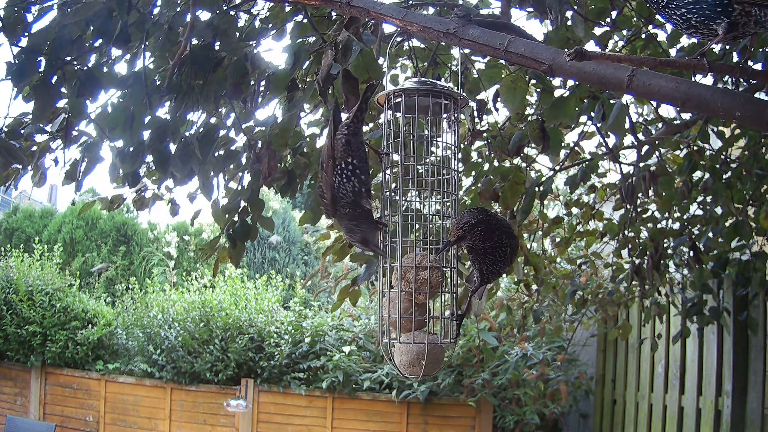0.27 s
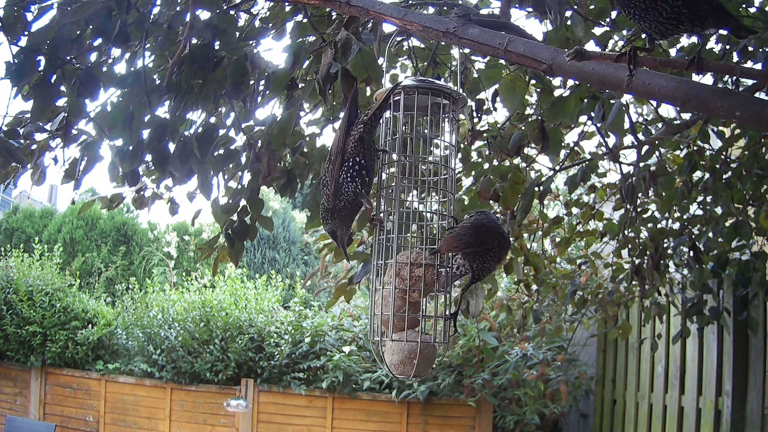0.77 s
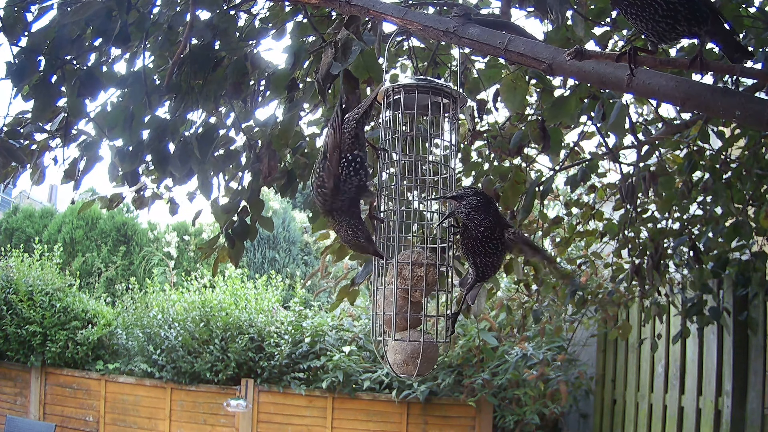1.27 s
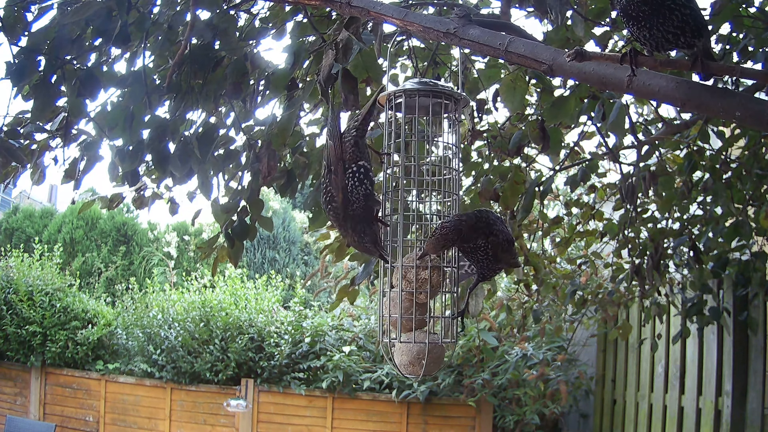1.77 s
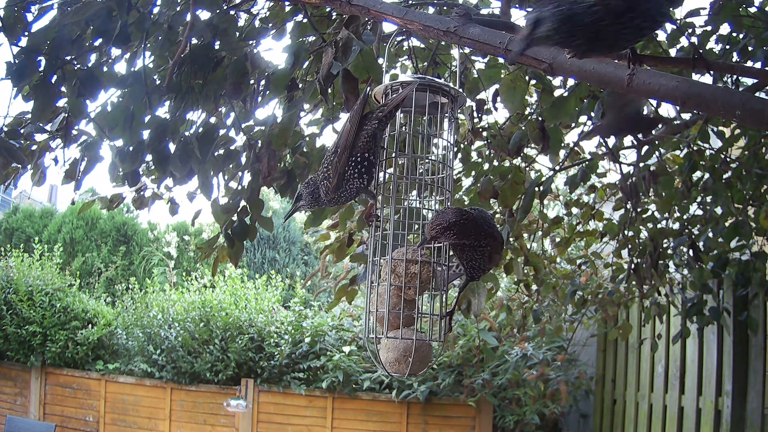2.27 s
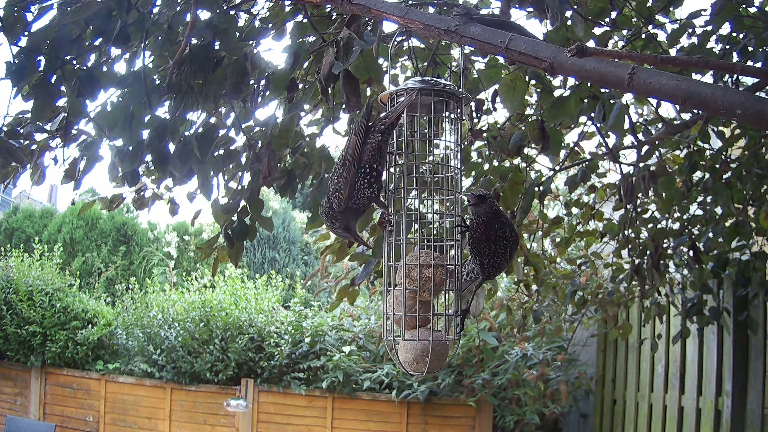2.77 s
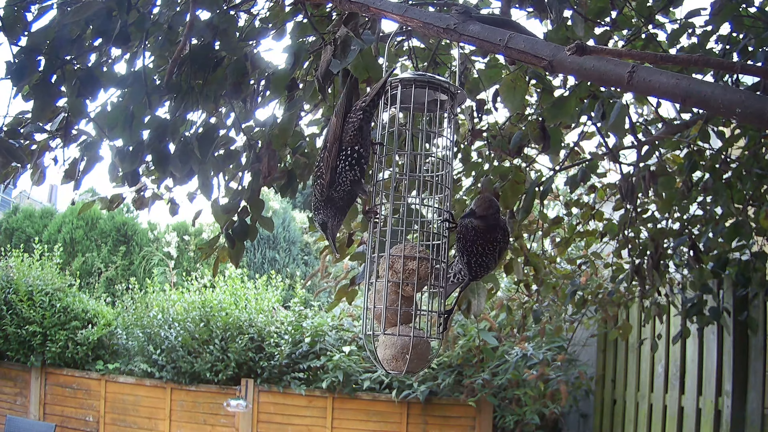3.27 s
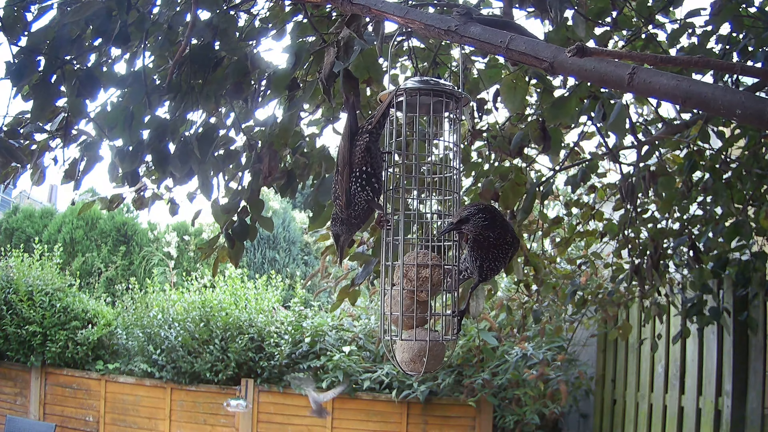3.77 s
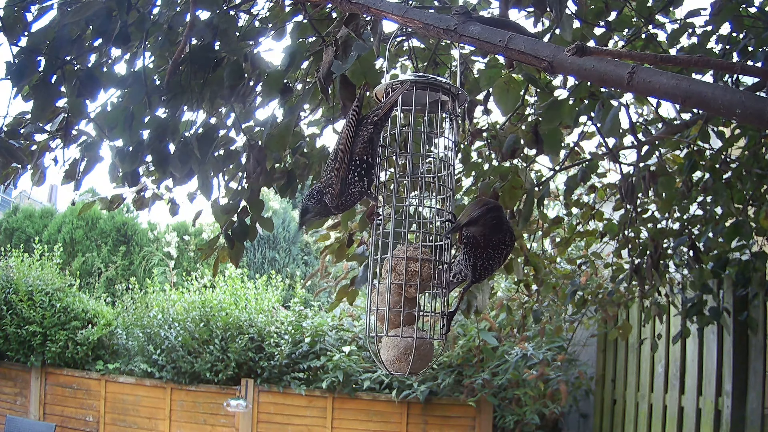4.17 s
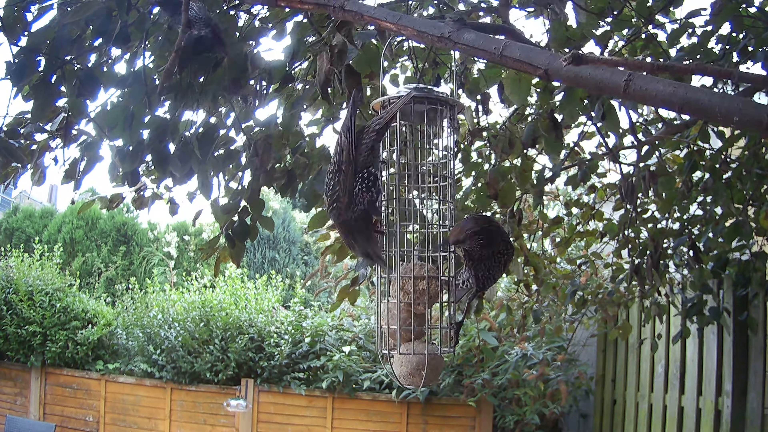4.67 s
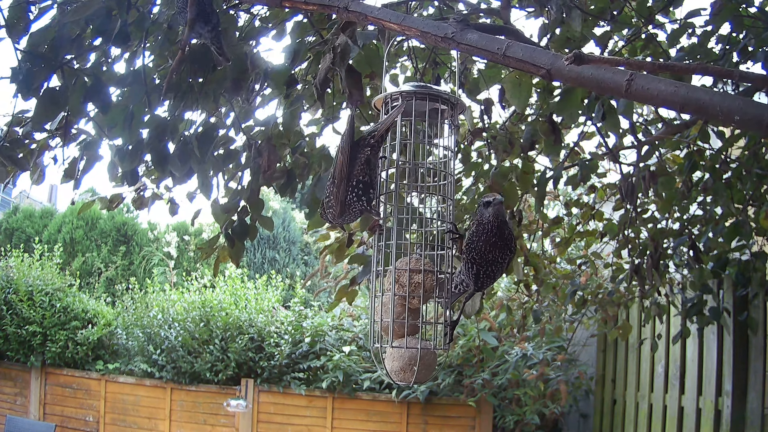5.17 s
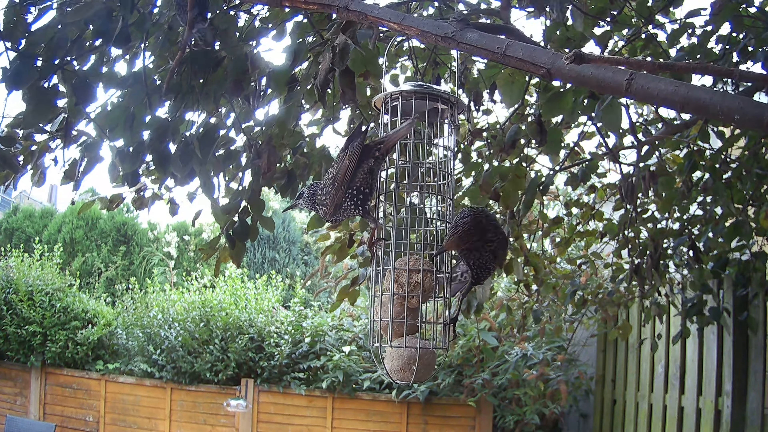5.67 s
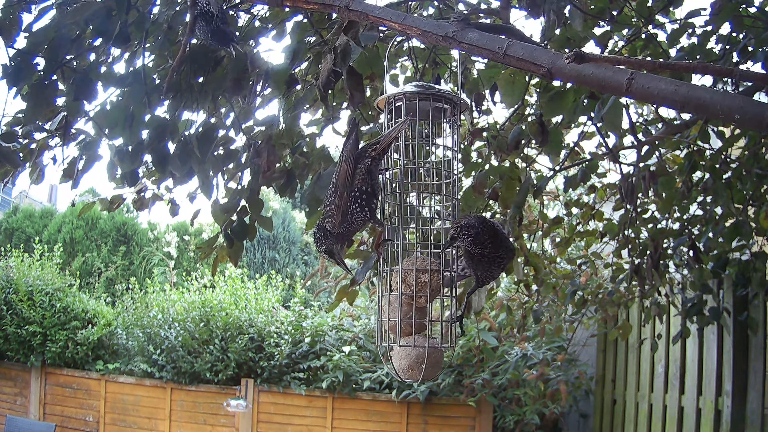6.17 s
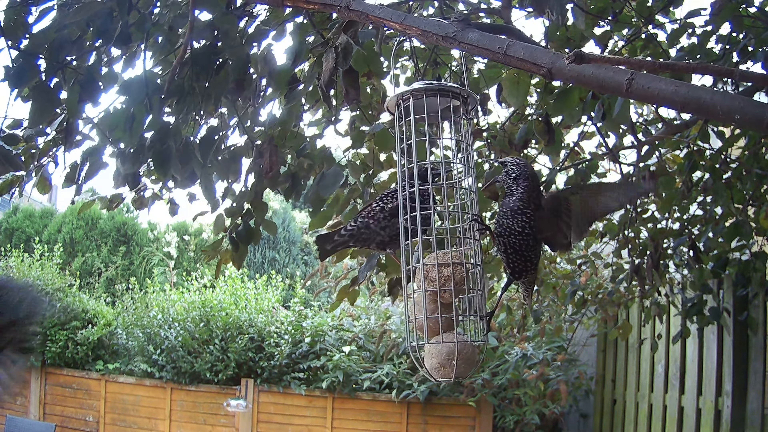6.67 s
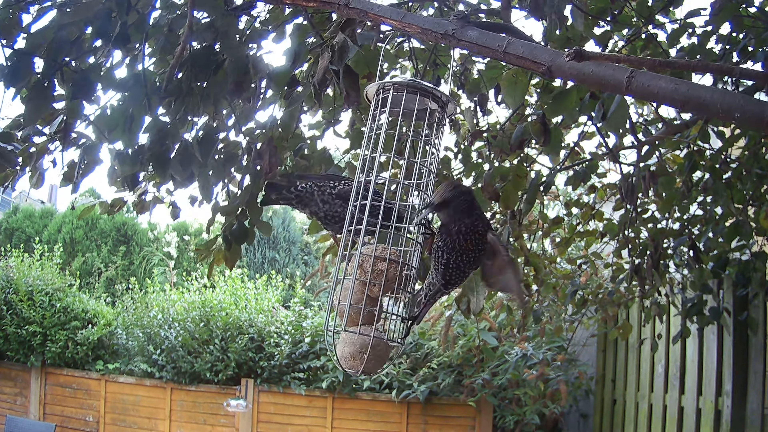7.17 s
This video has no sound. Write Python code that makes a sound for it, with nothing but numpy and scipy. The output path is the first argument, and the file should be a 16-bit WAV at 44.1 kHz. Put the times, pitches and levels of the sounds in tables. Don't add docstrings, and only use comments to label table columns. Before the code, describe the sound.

Starlings squabble on a wire garden feeder: buzzy squawks, piercing gliding whistles, beak ticks, a quiet lull with wing flutters, then a louder screeching fight.

```python
import sys
import numpy as np
from scipy import signal
from scipy.fft import rfft, irfft
from scipy.io import wavfile
from scipy.ndimage import uniform_filter1d, minimum_filter1d

SR = 44100
rng = np.random.default_rng(int(sys.argv[2]) if len(sys.argv) > 2 else 0)


def materialize(psi):
    bounded = np.clip(np.atleast_2d(psi).T, -1, 1)
    quanta = np.round(bounded * 32767).astype(np.int16)
    wavfile.write(sys.argv[1], SR, quanta)


def makeup_ratio(level_db):
    decades = np.asarray(level_db, float) / 20
    return 10 ** decades


N = 327663
T = np.arange(N) / SR


def unit(x):
    return x / np.sqrt(np.mean(x ** 2) + 1e-18)


def coloured(points, count=N):
    hz, db = np.transpose(points)
    f_hz = np.maximum(np.fft.rfftfreq(count, 1 / SR), 1)
    gain = makeup_ratio(np.interp(np.log(f_hz), np.log(hz), db))
    return unit(irfft(rfft(rng.standard_normal(count)) * gain, count))


def band(x, hz, width_hz):
    q = np.clip(hz / width_hz, .3, 99)
    return signal.lfilter(*signal.iirpeak(np.clip(hz, 20, .45 * SR), q, SR), x)


def walk(rate_hz, count=N):
    k = max(int(SR / rate_hz), 2)
    noise = rng.standard_normal(count + 2 * k)
    return unit(uniform_filter1d(uniform_filter1d(noise, k), k)[k:k + count])


def note(s, length_s, hz, db):
    u = np.linspace(0, 1, num=40)
    return np.transpose([s + length_s * u, hz(u), db(u) + 0 * u])


def curve(table, fade_s=0.0022):
    s, *columns = np.transpose(table)
    at = slice(int(max(s[0], 0) * SR), min(int(s[-1] * SR), N))
    t = T[at]
    already_on = s[0] < .002
    gate = np.clip(np.minimum(t - s[0] + already_on, s[-1] - t) / fade_s, 0, 1)
    return at, t, [np.interp(t, s, c) for c in columns], gate


def add(out, s, x):
    i = max(int(s * SR), 0)
    out[i:i + len(x)] += x[:N - i]


def syrinx(hz, second_db, third_db):
    phase = 2 * np.pi * np.cumsum(hz) / SR
    second = makeup_ratio(second_db) * (hz < 7900) * np.sin(2 * phase)
    third = makeup_ratio(third_db) * (hz < 5200) * np.sin(3 * phase)
    return np.sqrt(2) * (np.sin(phase) + second + third)


def buzz():
    # t/s, f/Hz, level/dB
    buzz_curve = [
        (0, 6630, -6.5),
        (.03, 5880, -6.5),
        (.058, 5880, -12.5),
        (.086, 5920, -8.5),
        (.092, 5750, -32.5),
    ]
    pulse_hz = 143.4
    out = np.zeros(N)
    at, t, (hz, db), gate = curve(buzz_curve)
    cycle = (t * pulse_hz + 0.94) % 1
    pulses = 0.05 + 5 * t + np.sin(np.pi * cycle) ** 1.3
    chirp_hz = hz - 1050 * (.5 - cycle) + 100 * walk(500, len(t))
    out[at] = gate * makeup_ratio(db) * pulses * syrinx(chirp_hz, -23, -60)
    return out


def rasp():
    # start t/s, length/s, centre f/Hz, level/dB
    screeches = [(0, 0.18, 6600, -34), (0.515, 0.2, 3800, -41.5), (0.72, .16, 4180, -35.5),
                 (0.888, 0.072, 5837, -24), (0.963, 0.0808, 3946, -35), (1.099, .1, 5880, -28.5),
                 (1.192, 0.32, 4920, -42.5), (4.417, 0.11, 5600, -37), (5.251, 0.17, 5380, -47),
                 (5.392, 0.23, 5600, -37.5), (5.948, 0.34, 4620, -49), (6.152, 0.062, 5080, -24.5),
                 (6.217, 0.12, 4677, -23.5), (6.3, 0.098, 5465, -20), (6.409, .22, 5026, -29),
                 (6.639, 0.38, 5100, -37.5), (6.945, 0.23, 3300, -36), (7.385, 0.1, 5290, -28)]
    out = np.zeros(N)
    for s, length_s, hz, db in screeches:
        count = int(length_s * SR)
        rise = np.linspace(0, 1, count)
        bursts = rng.standard_normal(count) * makeup_ratio(3.0 * walk(697, count))
        hiss = band(band(bursts, hz, 0.94 * hz), hz, 0.94 * hz)
        strands = np.zeros(count)
        for ratio in (.7, .9, 1.1, 1.35):
            wander = 1 - 1.5 * T[:count] + .1 * walk(60, count) + .02 * walk(400, count)
            strands += makeup_ratio(5 * walk(70, count)) * syrinx(hz * ratio * wander, -30, -40)
        voiced = makeup_ratio(.6 * (db + 20))
        shape = np.minimum(rise / 0.11 + (s < .002), 1) * np.minimum((1 - rise) / 0.46, 1)
        add(out, s, makeup_ratio(db) * shape * (unit(hiss) + voiced * unit(strands)))
    return out


def squawks():
    # start t/s, length/s, from f/Hz, to f/Hz, level/dB
    smooth_notes = [
        (.946, .066, 3500, 2900, -28),
        (.975, .035, 3900, 3300, -36),
        (0, .034, 3350, 3000, -31),
        (.034, .036, 1500, 1600, -35),
        (.066, .062, 1900, 2950, -36),
        (.036, .04, 3900, 3000, -37),
        (7.02, .07, 4400, 4750, -36),
        (6.555, .06, 5900, 4700, -15),
    ]
    warbled_notes = [
        (5.405, 0.19, 2100, 2802, -37.5),
    ]
    rich_notes = [
        (5.31, 0.085, 2950, 3350, -36),
        (.523, 0.027, 1200, 1200, -40),
    ]
    raspy_notes = [
        (5.428, 0.049, 6300, 6500, -35),
        (.6, .065, 6100, 5900, -40),
        (6.955, .065, 2800, 3000, -35.5),
        (1.79, .11, 1500, 2000, -62.5),
        (2.1, 0.051, 2700, 3100, -59.5),
        (5.49, .1, 5830, 5570, -37),
        (6.14, .035, 5400, 5650, -26),
        (7.405, 0.026, 6480, 6064, -17.5),
    ]
    far_notes = [
        (2.41, 0.12, 1500, 2900, -57.5),
        (2.47, .16, 1807, 1945, -58),
        (2.48, 0.12, 3100, 2505, -60),
        (3.985, .23, 2646, 2148, -43.5),
        (4.91, 0.18, 2256, 2350, -51.5),
    ]
    # t/s, f/Hz, level/dB
    left_bird = [
        [(0.548, 2570, -35), (0.5545, 2140, -36), (0.557, 2070, -35.5), (0.5649, 2890, -29),
         (0.5679, 2325, -40), (0.577, 3090, -37), (0.5949, 3450, -35), ],
        [(0.6, 3402, -33), (0.605, 4305, -31), (0.61, 2900, -33), (0.6195, 2935, -30), (0.626, 4010, -33),
         (0.632, 2890, -34), (0.651, 3900, -33.5), (0.659, 2750, -30.5), (0.6668, 3703, -30)],
        [(0.735, 3660, -29), (0.74, 3860, -28), (0.748, 3150, -25.5), (0.7524, 2978, -20),
         (0.7559, 3040, -16.5), (0.7589, 3445, -20), (0.7654, 2800, -22), (0.7734, 3096, -24.5),
         (0.7779, 2670, -28)],
        [(0.779, 4080, -36), (0.783, 4298, -35), (0.788, 3972, -28), (0.7905, 3617, -23), (0.7964, 3402, -24),
         (0.8219, 3732, -25)],
        [(0.822, 3224, -25), (0.825, 3531, -26), (0.8524, 3610, -28.5), (0.8559, 3880, -34),
         (0.8604, 2880, -27), (0.8624, 2842, -26), (0.8654, 3617, -24), (0.8679, 3706, -32)],
    ]
    right_bird = [
        [(5.105, 1427, -53), (5.119, 1665, -40), (5.1249, 2153, -35), (5.1604, 2700, -29), (5.1649, 2980, -38),
         (5.1673, 2196, -34), ],
        [(5.17, 2893, -31.5), (5.186, 2182, -32), (5.1875, 2540, -37), (5.191, 2340, -27), (5.1969, 2786, -30),
         (5.2044, 2293, -37), (5.2119, 2444, -32), (5.2428, 2730, -45), (5.2498, 2400, -49)],
        [(5.385, 3590, -39), (5.3885, 3775, -41), (5.3965, 2330, -38), (5.401, 1970, -35),
         (5.4229, 2470, -32.5), (5.4384, 3340, -23.5), (5.4424, 2750, -28), (5.4459, 2583, -38),
         (5.4498, 2971, -26)],
        [(5.45, 2950, -25), (5.4705, 3480, -38), (5.4759, 3218, -35), (5.4799, 3658, -29), (5.4834, 2830, -31),
         (5.4869, 2590, -32), (5.5054, 2800, -27), (5.5069, 2713, -19), (5.5099, 2325, -26)],
        [(5.51, 3617, -39), (5.5135, 3640, -22.5), (5.519, 2998, -27), (5.5574, 3280, -29.5),
         (5.5614, 2964, -30), (5.5793, 3424, -29.5), (5.5913, 3410, -26.5), (5.5998, 3380, -31)],
        [(6.952, 1596, -30), (6.9734, 1813, -26), (6.9784, 2068, -25), (6.9994, 1750, -30.5),
         (7.0183, 2541, -32.5), (7.0223, 2282, -31), (7.0298, 2325, -31)],
        [(7.0305, 2293, -28), (7.035, 2980, -29), (7.0465, 2096, -31.5), (7.0599, 2764, -22.5),
         (7.0759, 2145, -33), (7.0794, 2630, -26), (7.1118, 2410, -40), (7.1148, 2627, -41)],
    ]
    fight = [
        [(6.5, 5830, -8), (6.509, 6416, -13), (6.5269, 6330, -14.5), (6.5444, 6486, -15), (6.5499, 5469, -18),
         (6.5549, 6363, -20), (6.5574, 6130, -17), (6.5599, 6158, -24)],
        [(6.56, 5430, -14), (6.5655, 5768, -16), (6.5705, 5882, -13), (6.5755, 4766, -15.5),
         (6.5785, 5497, -14.5), (6.6019, 4702, -12), (6.6084, 4874, -11), (6.6179, 4565, -27)],
        [(6.158, 4800, -34), (6.162, 4707, -32), (6.1645, 4349, -30), (6.1675, 3680, -25), (6.1764, 3660, -32),
         (6.1789, 3080, -20), (6.1854, 2894, -27), (6.1959, 3460, -19)],
        [(6.238, 4005, -29), (6.2425, 3706, -16), (6.2505, 4760, -20), (6.2579, 4909, -22), (6.2834, 3919, -20),
         (6.2978, 3536, -24.5), (6.3098, 3710, -29)],
        [(6.222, 1895, -25), (6.2385, 2286, -27), (6.2415, 2960, -26), (6.2454, 2460, -21), (6.2524, 2375, -23),
         (6.2574, 2953, -26), (6.2624, 2680, -24), (6.2659, 2583, -26), (6.2699, 2756, -31)],
    ]
    # notes, hoarse share 0-1, overtone/dB, shake/Hz, fade/s, slide bend (under 1 = early)
    throats = [(warbled_notes, .08, -27, 200, .015, .4), (smooth_notes, .07, -30, 200, .012, 1.2),
               (rich_notes, .05, -5, 130, .015, .5), (raspy_notes, .35, -30, 240, .012, 1),
               (far_notes, .65, -28, 160, .07, 1.6)]
    voices = [(left_bird, .07, -26, 270, .002), (right_bird, .08, -28, 240, .002),
              (fight, .12, -24, 110, .002)]
    for notes, *voice, bend in throats:
        slides = [note(s, n, lambda u: a + (b - a) * u ** bend, lambda u: db) for s, n, a, b, db in notes]
        voices.append((slides, *voice))
    shake_rate_hz = 68
    out = np.zeros(N)
    for tables, hoarse, overtone_db, shake_hz, fade_s in voices:
        for table in tables:
            at, t, (hz, db), gate = curve(table, fade_s)
            n = len(t)
            hz = uniform_filter1d(hz, size=60)
            shake_turns = np.cumsum(shake_rate_hz * (1 + .4 * walk(50, n))) / SR
            shake = np.sin(2 * np.pi * shake_turns + 6 * rng.random())
            under_hz = np.maximum(.74 * hz + .6 * shake_hz * walk(90, n), 300)
            swing = np.tanh((shake * makeup_ratio(4 * walk(40, n)) + .7 * walk(260, n)) / 2)
            hz = np.maximum(hz + shake_hz * hz / 1900 * swing, 300)
            stroke = np.cumsum(78 * (1 + .3 * walk(40, n))) / SR % 1
            across_hz = uniform_filter1d(hz, size=500) * (1.4 - .55 * stroke)
            across = np.sin(np.pi * stroke) * syrinx(across_hz, -20, -40)
            lower = makeup_ratio(-10 + 3 * walk(35, n)) * syrinx(under_hz, -30, -40)
            lower += makeup_ratio(-3.5 + 3 * walk(35, n)) * across
            lower *= (shake_hz / 300) ** 2 * (hz < 4300)
            smear = np.sqrt(1 - hoarse) + np.sqrt(hoarse) * walk(1200, n)
            pulse_db = 3 * (1 - hoarse) * np.gradient(shake) * SR / (2 * np.pi * shake_rate_hz)
            level = makeup_ratio(db + pulse_db + 0.75 * walk(90, n))
            out[at] += gate * level * smear * (syrinx(hz, overtone_db, -31) + lower)
    return out


def rustle():
    # t/s, level/dB
    leaf_levels = [
        (0.398, -62),
        (1.6, -68.5),
        (2.2, -67.5),
        (3.101, -59),
        (3.9, -60.5),
        (4.9, -62.5),
        (6.001, -61.5),
        (7.199, -57.5),
    ]
    # t/s, peak level/dB
    beats = [(2.27, -46.5), (2.5673, -42.5), (2.669, -41.5), (2.839, -47), (2.909, -45.5), (3.05, -44),
             (3.1374, -43.5), (3.335, -46), (3.5796, -38), (3.638, -40.5), (3.8147, -31), (4.57, -33.5)]
    swell = makeup_ratio(np.interp(T, *np.transpose(leaf_levels)) + 7.5 + 2 * walk(8))
    t = T[:3000]
    for s, db in beats:
        add(swell, s, makeup_ratio(db - 11.5) * t / 0.0086 * np.exp(1 - t / 0.011))
    hiss = coloured([(500, -5.5), (1500, -11.0), (4000, 1.5), (8000, -1), (12000, -8.0), (16000, 5.0)])
    return swell * makeup_ratio(2 * walk(460)) * hiss


def air():
    # t/s, wind level/dB, traffic level/dB
    air_levels = [
        (0, -53, -57.5),
        (1.6, -60, -58.5),
        (2.35, -63, -65.5),
        (2.501, -46, -51.5),
        (3.9, -53, -57.5),
        (4.699, -59, -52),
        (6.1, -59.5, -54),
        (6.7, -46.5, -46),
        (7.43, -55, -50),
    ]
    # t/s, peak level/dB
    puffs = [
        (2.462, -23),
        (2.557, -35),
        (2.67, -35),
        (2.957, -36),
        (3.029, -35),
        (3.1, -36),
        (6.239, -32),
    ]
    # t/s, level/dB
    hush = [(0, -45.5), (.35, -56), (.9, -44.5), (1.6, -51), (1.75, -62.5), (2.4, -61), (3.1, -52.5),
            (4.2, -56.5), (4.55, -48.5), (4.9, -62.5), (5.35, -48.5), (5.9, -60), (6.3, -42.5),
            (7.43, -49.5)]
    # f/Hz, level/dB
    garden = [(47, -40.5), (80, -9.5), (307, -8), (409, -12), (532, -10.5), (649, -12), (7330, -30),
              (15500, -63)]
    s, *columns = np.transpose(air_levels)
    wind_db, road_db = (np.interp(T, s, c) for c in columns)
    out = makeup_ratio(wind_db) * coloured([(10, -19), (25, -2.5), (45, -5.5), (120, -33.5), (300, -73.5)])
    engine = syrinx(59 * (1 + .04 * walk(3)), -40, -40)
    tyres = coloured([(35, -39.5), (50, -5.5), (80, -9), (200, -14), (500, -50)])
    out += makeup_ratio(road_db) * (.8 * engine + 0.55 * tyres)
    hush_db = np.interp(T, *np.transpose(hush)) + 1.2 * walk(6)
    out += makeup_ratio(hush_db) * coloured([(40, -40)] + list(garden))
    t = np.linspace(-3, 3, 3500)
    for s, db in puffs:
        add(out, s - .035, makeup_ratio(db) * (t - .4) * np.exp(-t ** 2))
    return out


def ticks():
    # t/s, peak level/dB, centre f/Hz
    strikes = [(0.126, -20.5, 2760), (.209, -35, 8000), (0.2759, -32, 4050), (0.599, -20, 2980),
               (0.6674, -16, 3700), (0.8039, -10.5, 3100), (0.8694, -11, 3770), (1.014, -14, 3030),
               (1.116, -10.5, 4520), (1.7688, -47, 3050), (3.248, -39, 3310), (3.3372, -42.5, 3000),
               (3.568, -19, 3810), (3.641, -30, 4300), (3.7267, -41, 3446), (3.8128, -34, 4447),
               (3.8352, -32.5, 2307), (4.8528, -41, 3450), (5.7274, -40, 3786), (5.9543, -29, 1580),
               (6.021, -23, 3270), (6.0793, -25.5, 4500), (7.125, -11, 3580), (7.2769, -33, 2570)]
    out, t = np.zeros(N), T[:1500]
    for s, db, hz in strikes:
        burst = rng.standard_normal(1500) * (np.exp(-t / 0.00053) + 0.17 * np.exp(-t / .006))
        click = band(band(burst, hz, 1.5 * hz), 1900, 10000)
        add(out, s, makeup_ratio(db + 2.5) * click / np.max(np.abs(click)))
    return out


def tumble(head, stair):
    s, top_hz, first_db, last_db, scoop_s = head
    drop_s, length_s, step_hz, from_db, to_db = stair
    scoop, droop, droop_s = 0.11, .15, .024
    step_s, step_keep, floor_hz, step_lift, step_fade_db = .0185, .645, 3200, 0.053, -3
    t = np.arange(s, drop_s + length_s, 1 / 1000)
    bend = scoop * np.exp((s - t) / scoop_s) + droop * np.exp(np.minimum(t - drop_s, 0) / droop_s)
    high_hz = top_hz * (1 - bend)
    high_db = np.interp(t, [s, drop_s], [first_db, last_db])
    step, within = np.divmod(np.maximum(t - drop_s, 0) / step_s, 1)
    low_hz = floor_hz + (step_hz - floor_hz) * step_keep ** step
    low_hz = low_hz * (1 + step_lift * np.sin(np.pi * within))
    low_db = from_db + (to_db - from_db) * (t - drop_s) / length_s + step_fade_db * within
    return np.transpose([t, np.where(t < drop_s, high_hz, low_hz), np.where(t < drop_s, high_db, low_db)])


def whistles():
    # t/s, f/Hz, level/dB
    held = [
        [(1.125, 8230, -20), (1.175, 8205, -13), (1.192, 8780, -11), (1.266, 8870, -9), (1.33, 8765, -9),
         (1.352, 8710, -15), (1.44, 8590, -24)],
        [(6.085, 4330, -32), (6.095, 6190, -25), (6.106, 6275, -27.5), (6.126, 5330, -21.5), (6.136, 5500, -22)],
        [(6.413, 5520, -16), (6.424, 5980, -12.5), (6.432, 6490, -19), (6.452, 6846, -15.5),
         (6.458, 6795, -7.5), (6.485, 6470, -4), (6.5, 6314, -7.5)],
        [(6.612, 8554, -27), (6.68, 8690, -17.5), (6.71, 9123, -9), (6.78, 8830, -9.5), (6.86, 8500, -12),
         (6.93, 7720, -13.5), (6.995, 7103, -7.5), (7.03, 7150, -16), (7.088, 6870, -17), (7.14, 6900, -38)],
    ]
    # start t/s, top f/Hz, first level/dB, last level/dB, scoop/s
    heads = [
        (1.033, 8764, -17, -16, .024),
        (1.353, 8523, -11, -26, .003),
        (4.301, 8656, -31.5, -34.5, .006),
        (6.402, 8610, -15, -12.5, .008),
    ]
    # first step t/s, length/s, first step f/Hz, first level/dB, last level/dB
    stairs = [
        (1.105, .057, 6535, -11.5, -11.5),
        (1.458, 0.058, 6042, -5.5, -14.5),
        (4.386, 0.085, 5606, -23.5, -23.5),
        (6.494, 0.025, 5680, -11, -7),
    ]
    # start t/s, length/s, from f/Hz, to f/Hz, level/dB
    glides = [(0.684, .035, 4900, 5000, -41), (0.733, .03, 6300, 6600, -38),
              (0.901, .03, 1558, 1471, -40.5), (0.888, 0.015, 2902, 2340, -31),
              (1.022, 0.011, 5600, 5300, -32.5), (1.074, .044, 5032, 4070, -27),
              (1.207, 0.044, 2695, 1776, -35), (1.366, 0.1, 5460, 4210, -29),
              (4.35, .055, 5200, 3200, -50.5), (4.469, 0.0145, 3640, 2965, -25.5),
              (5.586, 0.0128, 2550, 926, -34.5), (6.191, 0.033, 1528, 1906, -26),
              (6.197, 0.017, 3205, 3645, -14), (6.215, .009, 3510, 3820, -11),
              (6.254, .045, 1512, 1196, -42), (6.264, 0.031, 5899, 4960, -22.5),
              (6.297, 0.013, 1760, 1750, -27.5), (6.316, .03, 1705, 1496, -35.5),
              (6.34, .025, 1494, 620, -42.5), (6.403, 0.0064, 1200, 1820, -30.5),
              (6.401, .011, 2500, 5200, -30), (6.1545, 0.0032, 5705, 5700, -15),
              (6.158, .0035, 5700, 5700, -17), (6.1616, 0.0032, 5800, 5800, -17),
              (6.312, .011, 2879, 2140, -22.5), (6.322, 0.024, 3200, 2600, -28),
              (6.425, .048, 6070, 4680, -20), (6.87, 0.042, 7857, 7770, -19),
              (7.369, 0.018, 1986, 4800, -41), (7.392, .012, 4887, 7170, -20),
              (7.393, 0.015, 3060, 1790, -32), (7.404, 0.025, 1684, 1236, -38.5)]
    # start t/s, length/s, foot f/Hz, top f/Hz, level/dB
    arches = [
        (1.043, 0.032, 4498, 5030, -29),
        (5.265, 0.018, 4230, 5680, -26.5),
        (6.314, .023, 4828, 7000, -7.5),
        (6.316, 0.016, 7737, 8500, -20),
        (7.09, 0.034, 4920, 5270, -30.5),
    ]
    # start t/s, length/s, held f/Hz, level/dB
    pips = [
        (.678, .048, 5863, -17),
        (0.877, .046, 5897, -13),
    ]
    notes = list(held) + [tumble(*parts) for parts in zip(heads, stairs)]
    for s, n, a, b, db in glides:
        notes.append(note(s, n, lambda u: a * (b / a) ** u, lambda u: db))
    for s, n, a, b, db in arches:
        notes.append(note(s, n, lambda u: a + (b - a) * np.sin(np.pi * .75 * u),
                          lambda u: db - 40 * (u - .55) ** 2))
    for s, n, a, db in pips:
        notes.append(note(s, n, lambda u: a * (1 + 0.079 * np.exp(-u / 0.14) - .3 * np.exp(-u / .04)
                                               + .16 * u ** 5),
                          lambda u: db - 6 * (1 - u)))
    out, tremble, flutter = np.zeros(N), walk(230), walk(78)
    for table in notes:
        at, t, (hz, db), gate = curve(table)
        hz = uniform_filter1d(hz, 90) * (1 + 0.004 * tremble[at])
        second_db = -18 - 12 * np.maximum(hz / 1000 - 4.5, 0)
        out[at] += gate * makeup_ratio(db + 1.9 * flutter[at]) * syrinx(hz, second_db, -48.0)
    return out


def far_birds():
    # start t/s, length/s, f/Hz, level/dB
    coos = [
        (.75, 0.76, 470, -61),
        (.7, 1.7, 260, -64),
        (2.47, 0.42, 450, -59.5),
        (5.16, 0.23, 526, -58),
        (5.45, 0.25, 470, -57),
    ]
    # start t/s, length/s, f/Hz, level/dB
    croaks = [(3.234, 0.026, 293.4, -50.5), (3.306, 0.017, 351, -46), (3.374, 0.02, 367, -44.5),
              (3.447, 0.024, 298, -48), (3.551, 0.12, 311.4, -46), (3.808, 0.015, 508, -43),
              (4.258, 0.014, 324, -48), (4.346, 0.017, 353, -47), (4.458, 0.147, 317, -40.5),
              (6.585, 0.016, 283, -53), (6.638, 0.014, 354, -40), (6.71, 0.018, 373, -34.5),
              (6.867, 0.09, 321.3, -38)]
    out = np.zeros(N)
    for s, length_s, hz, db in coos:
        count = int(length_s * SR)
        shape = np.sqrt(np.hanning(count)) * makeup_ratio(db + 5.1 * walk(25, count))
        fall = 1.01 - 0.0089 * T[:count] / length_s ** 2
        add(out, s, shape * syrinx(hz * fall * (1 + 0.018 * walk(30, count)), -36.5, -43))
    for s, length_s, hz, db in croaks:
        count = int(length_s * SR)
        shape = np.hanning(count) ** 0.44 * makeup_ratio(db + 2.4 * walk(46, count))
        croak_hz = hz * np.linspace(1.06, .92, count) * (1 + 0.095 * walk(119, count))
        add(out, s, shape * syrinx(croak_hz, -2 - 70 * length_s, -6 - 90 * length_s))
    return out


def rattles():
    # t/s, click rate f/Hz, level/dB
    trains = [
        [(1.225, 93.3, -36.5), (1.29, 59.87, -37.5), (1.34, 86, -41), (1.38, 140.6, -38), (1.445, 135.9, -39)],
        [(6.665, 120.4, -39), (6.73, 113.2, -35.5), (6.84, 122, -37), (6.88, 136.3, -32.5), (6.93, 138, -38.5)],
    ]
    # f/Hz, width/Hz, level/dB
    formants = [(3000, 650, 1), (4700, 1090, 2.5), (7000, 1800, -0.5), (10800, 2400, -10.5)]
    clicks = np.zeros(N)
    for train in trains:
        at, t, (hz, db), gate = curve(train)
        turns = np.floor(np.cumsum(hz * (1 + 0.057 * walk(60, len(t)))) / SR)
        clicks[at] = np.diff(turns, prepend=0) * makeup_ratio(db + 33.5 + 2.9 * walk(200, len(t)))
    out = np.zeros(N)
    for k, (hz, width_hz, db) in enumerate(formants):
        out += (-1) ** k * makeup_ratio(db) * band(band(clicks, hz, width_hz), hz, 1.1 * width_hz)
    return out


def fences(x, t60_s=0.29, wet_db=-11):
    t = T[:30000]
    tail = rng.standard_normal(30000) * np.exp(-np.log(1000) * t / t60_s) * np.clip(t / 0.0017, 0, 1)
    tail *= makeup_ratio(wet_db) / np.sqrt(np.sum(tail ** 2))
    tail[int(.0045 * SR)] += makeup_ratio(-14.5)
    tail[int(.013 * SR)] += makeup_ratio(-15.0)
    return x + signal.fftconvolve(x, tail)[:N]


def scene():
    near = buzz() + rasp() + squawks() + ticks() + whistles() + rattles()
    return (fences(near) + fences(far_birds(), wet_db=-5.5) + rustle() + air())[None]


def top_cut(x):
    return signal.sosfilt(signal.butter(12, 15680, fs=SR, output="sos"), x)


def record(dry):
    dull = signal.sosfilt(signal.butter(6, 9700, fs=SR, output="sos"), dry)
    heard = dull + makeup_ratio(-19.0) * (dry - dull)
    highpass = signal.butter(2, 900, "high", fs=SR, output="sos")
    heard = heard + makeup_ratio(-27) * signal.sosfilt(highpass, heard ** 2)
    gain = np.minimum(.7 / (np.abs(heard) + 1e-9), 1)
    gain = uniform_filter1d(minimum_filter1d(gain, size=89), size=45)
    return top_cut(heard * gain)


dry = scene()
out = record(dry)
materialize(out)
```